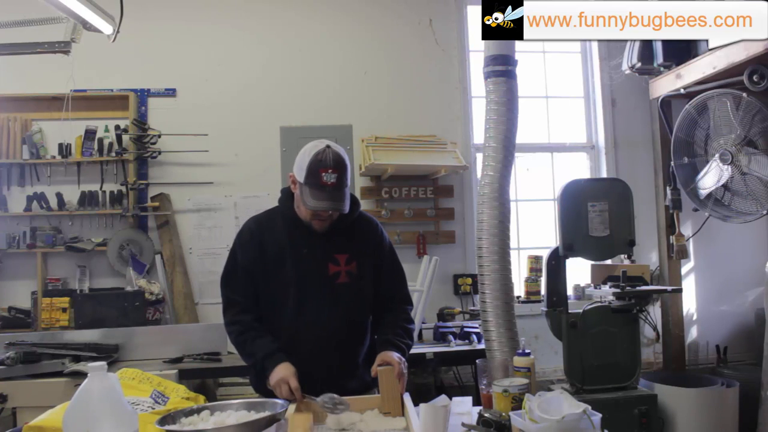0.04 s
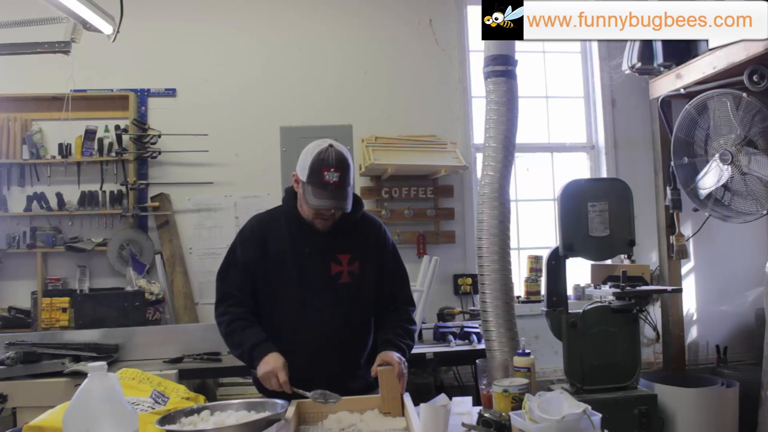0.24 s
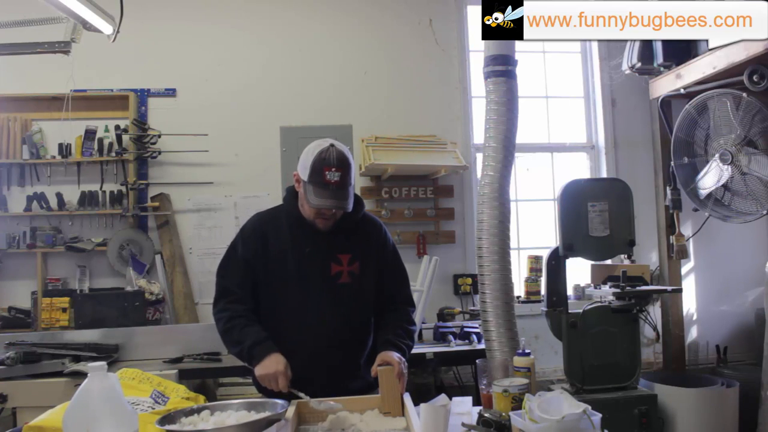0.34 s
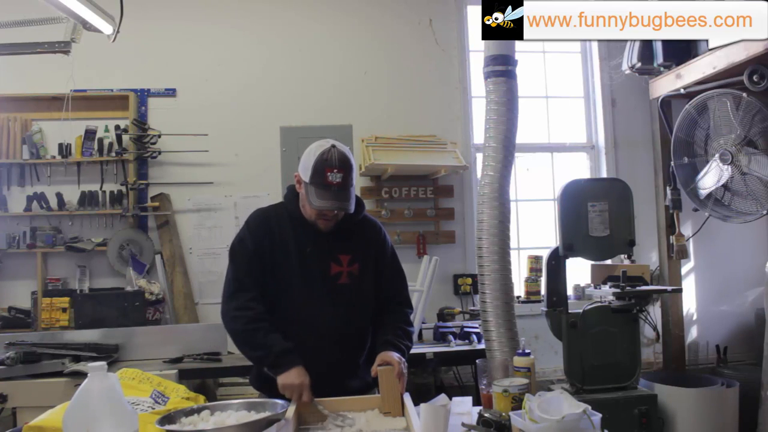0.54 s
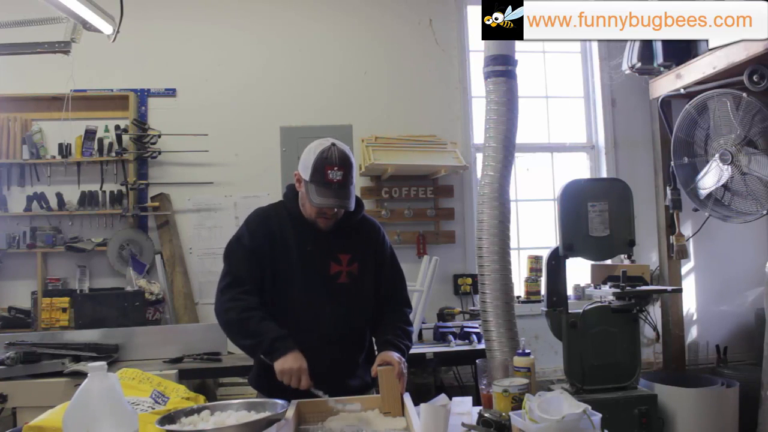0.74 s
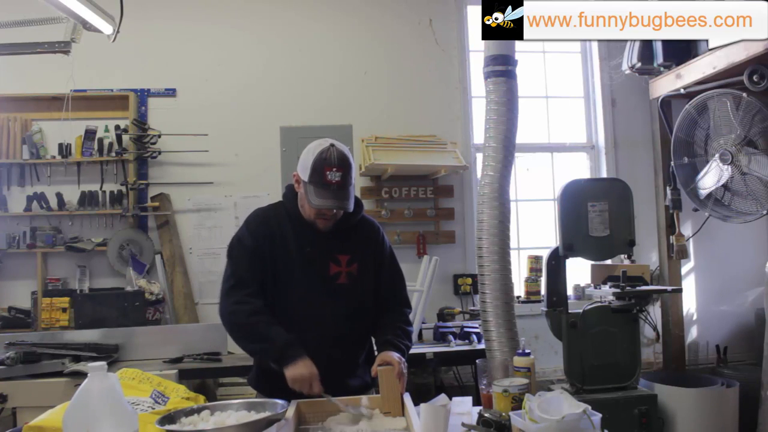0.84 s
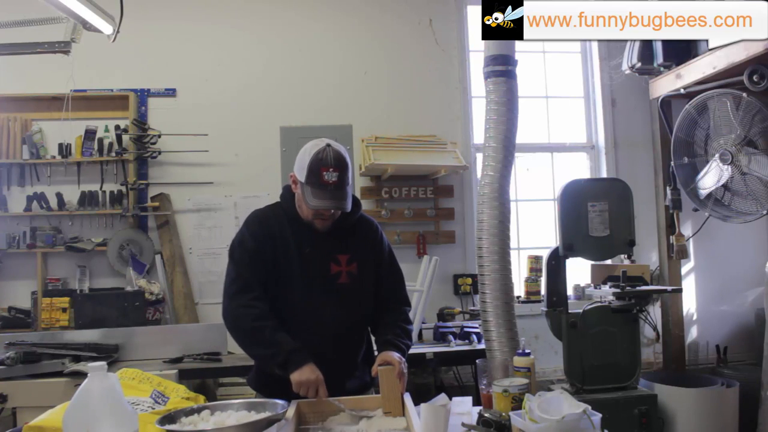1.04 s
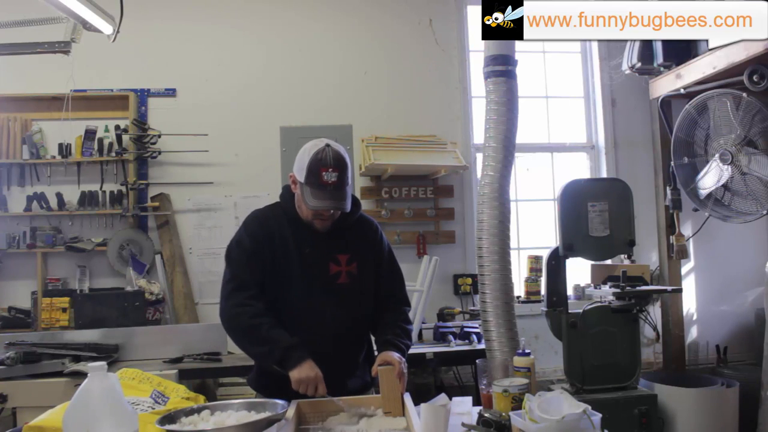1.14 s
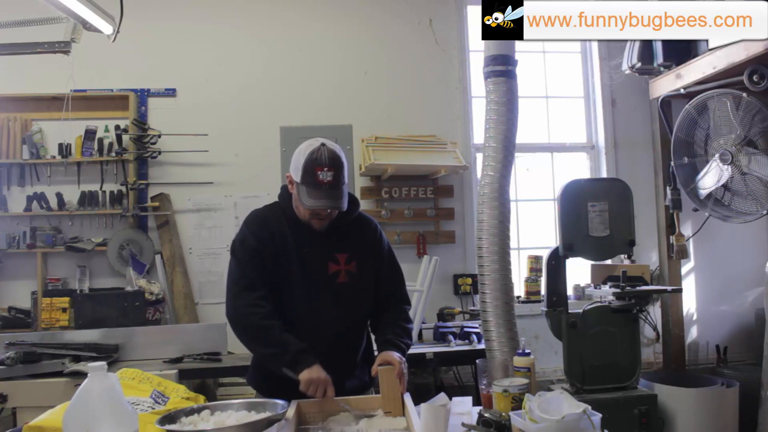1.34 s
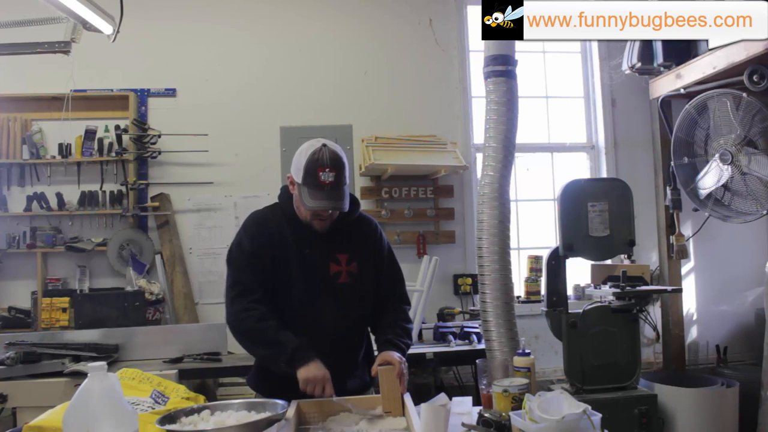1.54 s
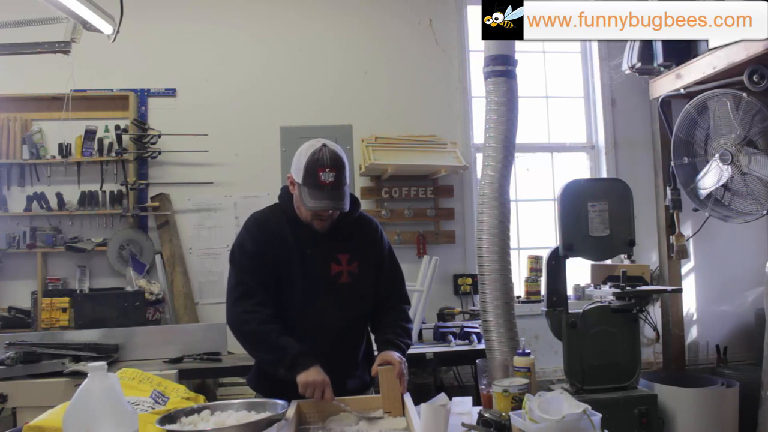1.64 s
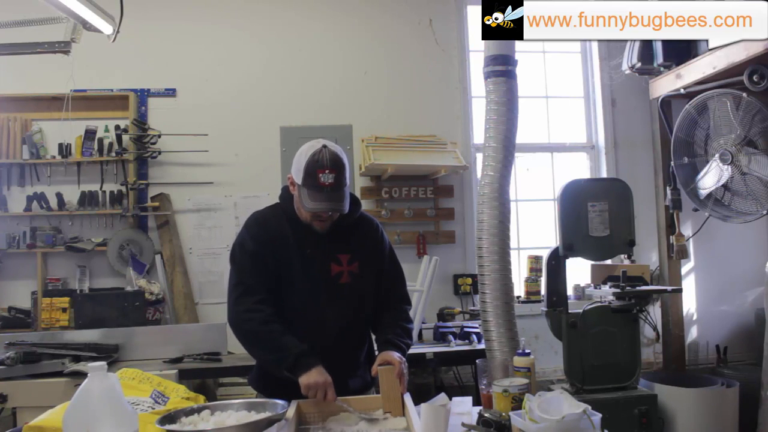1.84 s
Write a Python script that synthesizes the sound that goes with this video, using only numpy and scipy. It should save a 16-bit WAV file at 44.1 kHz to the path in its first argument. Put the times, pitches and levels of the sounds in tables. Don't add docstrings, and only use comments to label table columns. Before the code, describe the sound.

Spoon against wood and grainy sugar: a brief scrape, a loud woody clack, quick crunchy scraping that fades, then faint grazes and separate soft taps, picked up at some distance in a hard-walled workshop over low hiss.

```python
import sys
import numpy as np
from scipy import signal
from scipy.fft import rfft, irfft
from scipy.io import wavfile
from scipy.ndimage import uniform_filter1d

SR = 44100
rng = np.random.default_rng(int(sys.argv[2]) if len(sys.argv) > 2 else 0)


def to_linear_factor(level_db):
    exponent = np.asarray(level_db, float) / 20
    return 10 ** exponent


def persist_wave(psi):
    counts = np.round(np.clip(psi, -1, 1) * 32767).astype(np.int16)
    wavfile.write(sys.argv[1], SR, np.atleast_2d(counts).T)


N = 83790
T = np.arange(N) / SR

# frequency in Hz, level in dB, random waver in dB.
HUM = [(59.8, -66, 4), (119.6, -62, 2)]
BEAT_S, BEAT_PEAK_S, BEAT_DEPTH = 0.56, 0.68, 1
# frequency in Hz, density in dB per Hz.
HISS = [(15, -21), (25, -8), (127, -2.5), (195, -14), (451, -14.5), (1020, -17), (1480, -17.5), (2610, -21),
        (16000, -30.5)]
HISS_DB = -57
# frequency in Hz, 60 dB decay time in seconds.
ROOM_T60 = [(100, 0.46), (300, 0.55), (1000, 0.43), (3000, 0.44), (7000, 0.37), (15000, 0.068)]
ROOM_DB, ROOM_GAP_S, ROOM_BUILD_S = -6, 0.0086, 0.018
# start in seconds, level in dB, frequency in Hz, length in seconds.
THUDS = [
    (0.081, -40.5, 69.6, 0.15),
    (0.213, -47, 59, .06),
    (0.332, -44.5, 44.5, 0.1),
    (1.247, -50, 70, 0.045),
]
# start in seconds, level in dB, frequency in Hz.
TICKS = [(.2385, -10.5, 4730), (.344, -28, 5530), (.346, -52, 12100), (0.603, -36, 6500),
         (0.613, -42, 4900), (0.8236, -40.5, 3230), (0.949, -50, 4220), (0.9849, -35.5, 11300),
         (0.987, -32.5, 4460), (1.0045, -34, 4230), (1.013, -41, 5840), (1.023, -40, 12300),
         (1.047, -32, 5940), (1.037, -50, 13500), (1.253, -35, 3800), (1.2892, -34, 2090),
         (0.826, -44.5, 1110), (1.2385, -54, 10000), (1.259, -39, 7200), (0.603, -47, 14400),
         (1.313, -43.5, 9800), (1.573, -69, 4440), (1.634, -33.5, 3750)]
# frequency in Hz, level in dB, 60 dB decay time in seconds.
WOOD_MODES = [(107.3, -2, 0.13), (182.6, -11.5, 0.076), (250, -5, 0.041), (336.8, -5, 0.11),
              (430, 4, 0.049), (568.7, 0, 0.043), (624, 3.5, 0.028), (772, 2.5, 0.039), (932.3, -2, 0.12),
              (1000, 4, 0.07), (1140, -2, 0.062), (1450, -8, 0.051), (1670, 7, 0.059), (2250, -4, .07)]
# frequency in Hz, level in dB, 60 dB decay time in seconds.
SPOON_MODES = [(2750, -16, 0.02), (3460, -9.5, 0.18), (4040, -0.5, 0.022), (3835, 2.5, 0.087),
               (4400, 3, 0.027), (5126, 0, 0.021), (6100, -14, 0.037), (6470, 5.5, 0.12)]
# start in seconds, rise in seconds, hold in seconds, level in dB,
# tilt in dB per octave.
STROKES = [
    (0.068, 0.036, 0.017, -31.5, -0.5),
    (0.245, 0.043, 0.059, -38, -0.5),
    (0.322, 0.007, 0.073, -32, -2.5),
    (0.423, 0.018, 0.054, -44, -4),
    (0.529, 0.041, 0.058, -48.5, 0.5),
    (0.609, 0.014, 0.038, -53.5, -1.5),
    (0.933, 0.0084, 0.11, -52, 5),
    (0.979, 0.031, 0.047, -45.5, 2),
    (1.255, 0.0045, 0.057, -43.5, -2),
    (1.599, 0.0098, 0.068, -50, -2),
]
STROKE_FALL_S, STROKE_WOOD_DB = 0.037, -12
# frequency in Hz, density in dB per Hz.
GRIT = [(59, -25), (100, -15.5), (648, -0.5), (970, 1.5), (1200, 0), (1720, -1), (4570, -8.5),
        (16000, -27.5)]
CHATTER_PER_S, GRAINS_PER_S, GRAIN_SPREAD_DB = 1500, 9000, 2.5
# start in seconds, level
# in dB, frequency where the wood speaks in Hz, chatter in milliseconds, crack level in dB.
KNOCKS = [(.2003, -35, 4340, 2.4, -23.5), (0.2029, -20, 263, 9.1, -16), (0.2078, -23, 1700, 11.2, -19),
          (.2045, -23.5, 738, 6.4, -38), (0.217, -53, 1670, 6.7, -13.5), (.235, -28, 344, 18, -40),
          (.241, -34, 1660, 4, -44), (.268, -33, 330, 6.9, -27.5), (0.334, -44, 286, 16, -36),
          (.336, -29.5, 970, 8.9, -31), (.336, -34.5, 1657, 13, -49), (.35, -35, 1000, 9.2, -42),
          (.379, -44, 294, 4.7, -34.5), (.398, -37, 337, 24, -47), (0.444, -36, 112.4, 9, -48),
          (.1, -39.5, 643, 9.7, -37.5), (.206, -22.5, 470, 7.7, -41), (.261, -36, 950, 5.8, -50),
          (.42, -41, 1646, 22, -51), (.47, -41.5, 1000, 15.5, -56), (.53, -49.5, 280, 29, -45),
          (.938, -49.5, 110, 10, -57), (0.949, -60, 2200, 11, -65), (.985, -47.5, 544, 18, -49),
        (.99, -51, 260, 21, -52), (1.05, -51.5, 1000, 25, -76), (1.238, -50, 497, 6.5, -50),
        (1.2489, -39, 633, 7.5, -41.5), (1.252, -44, 1590, 23, -60), (1.255, -43.5, 430, 20, -43),
        (1.275, -49.5, 256, 15, -52), (1.312, -60, 634, 3.3, -50), (1.5725, -39, 537, 8.9, -51),
        (1.572, -53, 1270, 20, -73), (1.574, -63, 4530, 40, -70), (1.594, -44.5, 480, 19, -74),
        (1.634, -55, 3840, 21, -49), (1.645, -49, 308, 19, -49.5), (1.65, -55, 2250, 16, -65),
        (1.685, -53.5, 271, 25, -64)]
# frequency in Hz, density in dB per Hz.
CRACK = [(150, -6), (400, 1.5), (1200, -3.5), (2500, -4), (4500, -4), (8000, -12.5), (16000, -22.5)]
SPEAKS_OCT = 0.29


def unit(x):
    return x / np.sqrt(np.mean(x ** 2) + 1e-30)


def read(table, hz):
    a = np.array(table, float)
    return np.interp(np.log(np.maximum(hz, 1)), np.log(a[:, 0]), a[:, 1])


def colour(x, table, tilt_db=0.):
    hz = np.fft.rfftfreq(len(x), 1 / SR)
    gain_db = read(table, hz) + tilt_db * np.log2(np.maximum(hz, 150) / 2000)
    return irfft(rfft(x) * to_linear_factor(gain_db), len(x))


def ring(x, hz, t60):
    decay = np.log(1000) / (max(t60, .005) * SR)
    pole = np.exp(2j * np.pi * hz / SR - decay)
    return signal.lfilter([1], [1, -pole], x).imag


def clicks(rate, size):
    u = rng.random((3, size))
    happens = u[0] < rate / SR
    height = to_linear_factor(-GRAIN_SPREAD_DB * np.log(u[2] + .03))
    return happens * np.sign(u[1] - .5) * height


def walk(rate):
    k = int(SR / rate)
    steps = np.repeat(rng.standard_normal(N // k + 1), k)
    return unit(uniform_filter1d(uniform_filter1d(steps, k), k)[:N])


def add(out, start_s, x):
    i = int(start_s * SR)
    out[i:i + len(x)] += x[:N - i]


def background():
    beat = 1 + BEAT_DEPTH * np.cos(2 * np.pi * (T - BEAT_PEAK_S) / BEAT_S)
    low, high = (to_linear_factor(db + waver_db * walk(35)) * np.sin(2 * np.pi * hz * T + 0.24 * walk(23))
                 for hz, db, waver_db in HUM)
    hiss = unit(colour(rng.standard_normal(N), HISS))
    return low + beat * high + to_linear_factor(HISS_DB + 0.1 * walk(2.2)) * hiss


def room(x):
    t = T[:SR * 3 // 4]
    build = np.clip((t - ROOM_GAP_S) / ROOM_BUILD_S, 0, 1)
    tail = 0
    for k in range(8):
        hz = 90 * 2. ** k
        octave = signal.butter(2, [hz / 2 ** .5, hz * 2 ** .5], "band", fs=SR, output="sos")
        band = signal.sosfilt(octave, rng.standard_normal(len(t)))
        fade = to_linear_factor(-60 * t / read(ROOM_T60, hz)) * build
        tail = tail + band * fade / np.sqrt(np.sum(fade ** 2))
    return to_linear_factor(ROOM_DB) * signal.fftconvolve(x, tail)[:N]


def thuds():
    out = np.zeros(N)
    for start_s, db, hz, length_s in THUDS:
        u = np.clip((T - start_s) / length_s, 0, None)
        swell = np.e * u * np.exp(-2 * u)
        out += to_linear_factor(db) * swell * np.sin(2 * np.pi * hz * (T - start_s))
    return out


def ticks():
    out = np.zeros(N)
    for start_s, db, hz in TICKS:
        snap = rng.standard_normal(size=2000) * np.exp(-T[:2000] / 0.00054)
        overtone = ring(snap, min(1.6 * hz, 15000), 14 / hz)
        x = ring(snap, hz, 16 / hz) + 0.3 * overtone + 0.99 * snap
        add(out, start_s, to_linear_factor(db) * x / np.abs(x).max())
    return out


def strokes():
    out = np.zeros(N)
    for start_s, rise_s, hold_s, db, tilt_db in STROKES:
        u = T - start_s
        fall = np.exp(-np.clip(u - rise_s - hold_s, 0, None) / STROKE_FALL_S)
        env = np.clip(u / rise_s, 0, 1) ** 0.95 * fall
        grains = clicks(GRAINS_PER_S, N) * to_linear_factor(1.2 * walk(120))
        solid = sum(to_linear_factor(g + (tilt_db - 6.0) * np.log2(max(f, 300) / 1000)) * ring(grains * env, f, t60)
                    for f, g, t60 in WOOD_MODES[2:] + SPOON_MODES)
        air = unit(colour(grains, GRIT, tilt_db)) * env
        air_rms = np.sqrt(np.mean(air ** 2))
        out += to_linear_factor(db) * (air + to_linear_factor(STROKE_WOOD_DB) * unit(solid) * air_rms)
    return out


def knocks():
    out, size = np.zeros(N), SR // 3
    t = T[:size]
    for start_s, db, hz, chatter_ms, crack_db in KNOCKS:
        fade = np.exp(-t * 1000 / max(chatter_ms, .5))
        push = clicks(CHATTER_PER_S, size) * fade
        push[0] = 1.33
        push = uniform_filter1d(np.roll(push, int(SR / hz / 6)), int(SR / hz / 3) + 1)
        body = 0
        for k, (f, g, t60) in enumerate(WOOD_MODES + SPOON_MODES):
            distance = np.log2(f / hz) / SPEAKS_OCT * (hz / 500) ** 0.34
            body = body + (-1) ** k * to_linear_factor(g - 5.74 * distance ** 2) * ring(push, f, t60)
        onset_rms = np.sqrt(np.mean(body[:SR // 50] ** 2))
        crack = unit(colour(clicks(GRAINS_PER_S, size), CRACK)) * fade
        add(out, start_s, to_linear_factor(db) * body / onset_rms + to_linear_factor(crack_db) * crack)
    return out


def scene():
    low_cut = signal.butter(3, 88, "high", fs=SR, output="sos")
    near = signal.sosfilt(low_cut, knocks() + strokes() + ticks())
    return (near + room(near) + thuds() + background())[None]


def top_cut(x):
    return signal.sosfilt(signal.butter(12, 16980, fs=SR, output="sos"), x)


def record(dry):
    low_pass = signal.ellip(8, .2, 24, 15850, fs=SR, output="sos")
    mix = signal.sosfilt(low_pass, dry)
    return top_cut(mix)


dry = scene()
out = record(dry)
persist_wave(out)
```